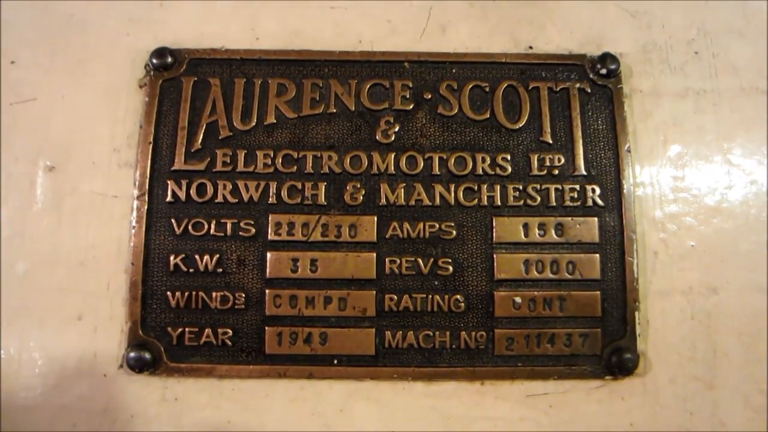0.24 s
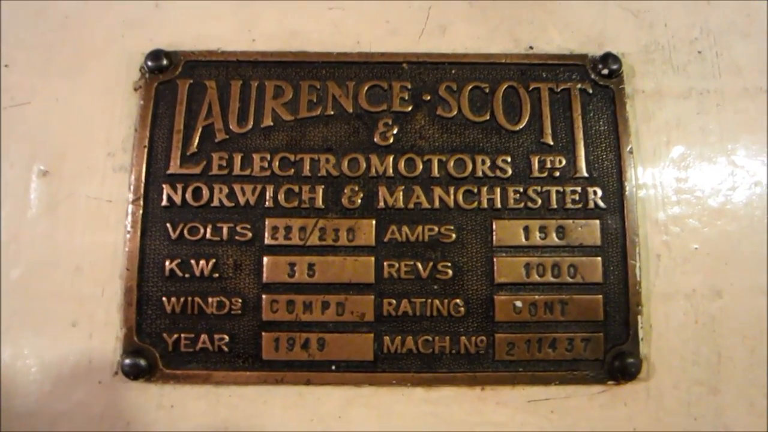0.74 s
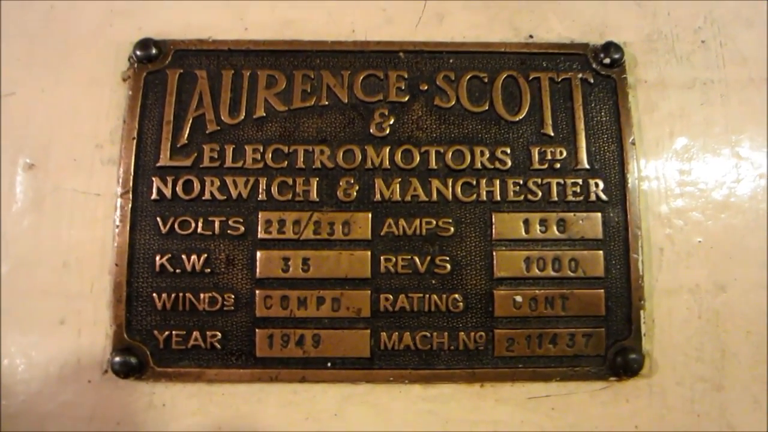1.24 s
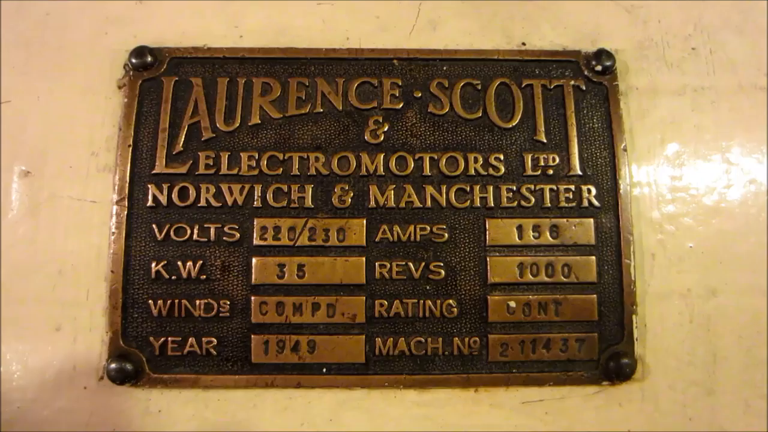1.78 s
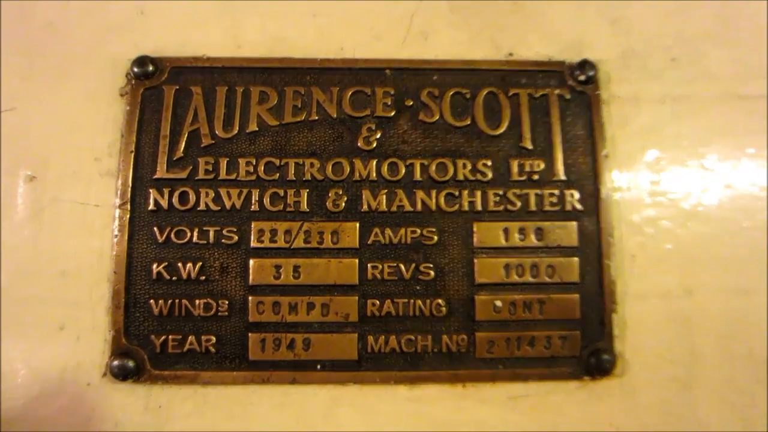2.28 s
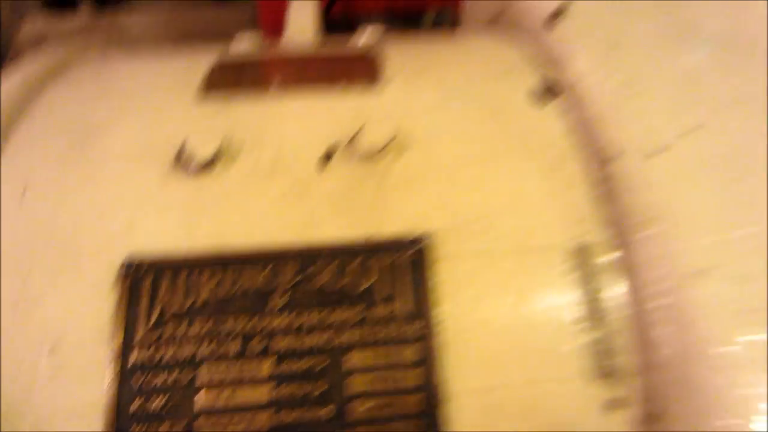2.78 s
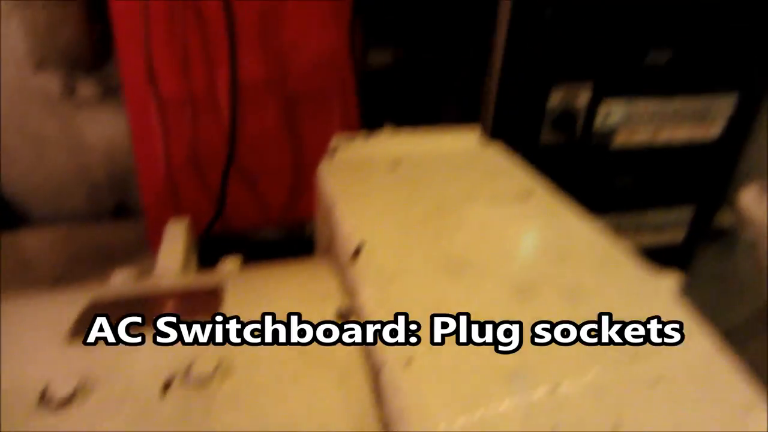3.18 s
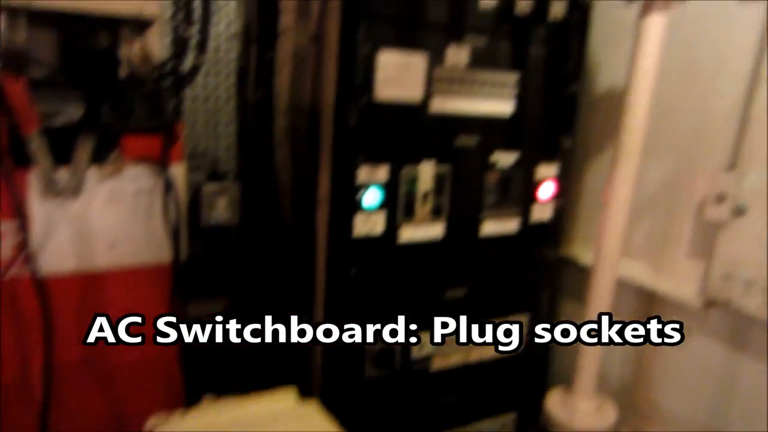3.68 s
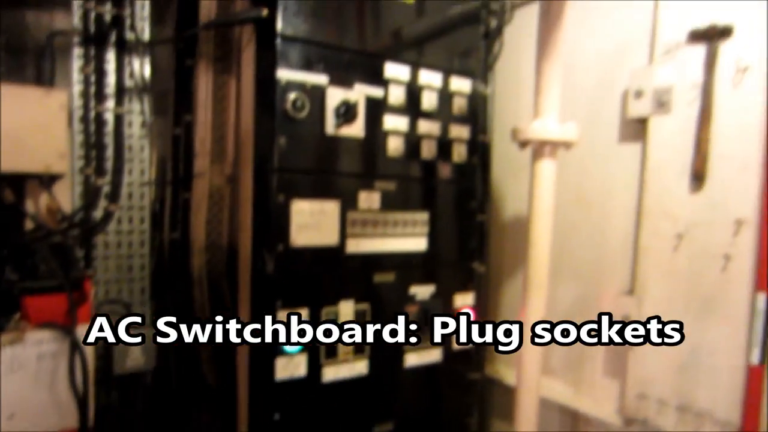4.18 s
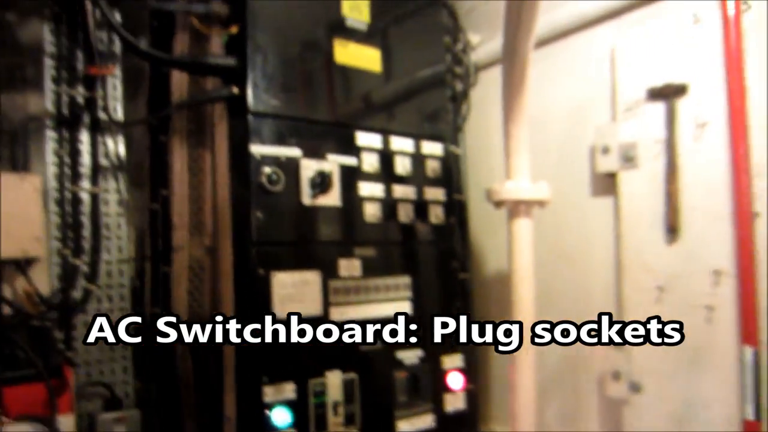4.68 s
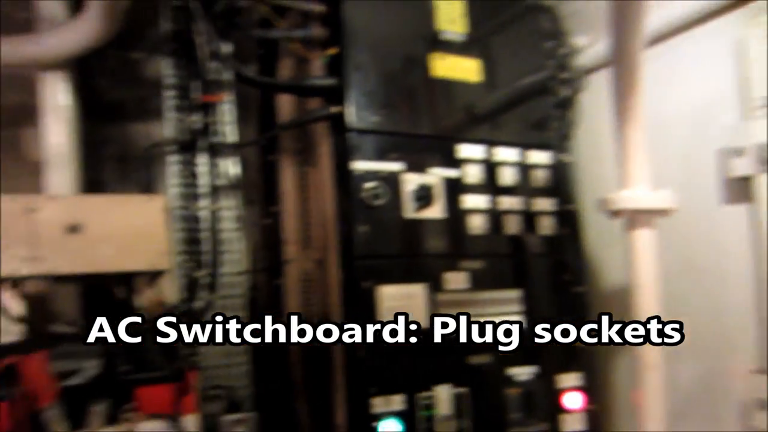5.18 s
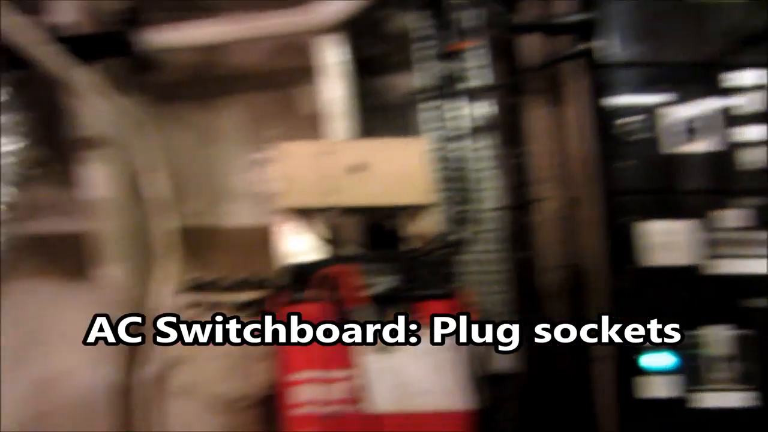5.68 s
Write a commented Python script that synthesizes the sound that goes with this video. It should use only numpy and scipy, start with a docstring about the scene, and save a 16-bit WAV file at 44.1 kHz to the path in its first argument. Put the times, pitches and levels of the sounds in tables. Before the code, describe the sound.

Continuous loud machinery drone, starting beside a cream-painted generator: heavy bass hum, rough engine tones and reverberant roar. Fast valve flutter and a faint, slightly fuzzy whistle sit above. Around three seconds the handheld microphone swings towards the room and switchboard; the single hum recedes, other buzzing tones and airy hiss come forward, and the noise then holds to the end. No speech or separate events.

```python
"""Diesel engine room

Two diesels at slightly different speeds, pumps and fans hum as sums of shaft-order tones over shaped noise.
Once a cycle the valves hiss and random blows ring their gear; a nearly steady whistle, a tone with a slightly
fuzzy edge of narrow noise, rides on top.
The microphone swings from beside a generator to the open room, which changes level and colour."""
import sys
import numpy as np
from scipy import signal
from scipy.fft import rfft, irfft, next_fast_len
from scipy.io import wavfile
from scipy.ndimage import uniform_filter1d

SR = 44100
rng = np.random.default_rng(int(sys.argv[2]) if len(sys.argv) > 2 else 0)


def transcribe(signal):
    """Save signal, clipped to [-1, 1], as a 16-bit WAV file at the path in sys.argv[1]."""
    frames = np.atleast_2d(signal).T
    limited = np.clip(frames, -1, 1)
    pcm = np.round(limited * 32767).astype(np.int16)
    wavfile.write(sys.argv[1], SR, pcm)


N = 261954

CYCLE_HZ, SECOND_CYCLE_HZ = 8.4945, 8.692  # four-stroke cycles of the two diesels
FIRST_FIRING_S, SECOND_FIRING_S, FIRST_VALVE_S = .0085, .0128, .116
SWING_START_S, SWING_END_S = 2.6, 4.1
HUM_ORDER, HUM_NEAR_DB, HUM_OPEN_DB = 18, -15.5, -20.5  # the strongest hum, a standing wave
SURGE_RAD, SURGE_S = .19, .11  # swing of the hum's phase, moment of its greatest lead
FAINT_OPEN_DB = 1.5  # added to the faint orders in the open room
PUMP_HZ, PUMP_DB, ORDER_5_DB = 43.025, -38, -46.5  # levels beside the generator
THROB_DIP_S, THROB_OPEN_DB = .96, 2  # moment when pump and order 5 oppose, lift in the open room
TREBLE_NEAR_DB, TREBLE_OPEN_DB = 7, 1.1  # lift of the roar above 1 kHz
PATCH_DB, SWAY_DB, SWAY_TOP_HZ = .71, .33, 9  # roar: drifting patches, common slow sway
RIPPLE_DB = .8  # the steel room favours some narrow bands
FLICKER_DB, FLICKER_TOP_HZ = .75, 300  # rms flicker of the roar's body
KNOCK_DB, KNOCK_AFTER_S = .5, .0125  # lift of the body just after the valves seat
HISS_NEAR_DB, HISS_OPEN_DB = 3.5, 5  # greatest possible height of a hiss burst
VALVE_NEAR_DB, VALVE_OPEN_DB = -64.5, -55.5
WHISTLE_WIDTH_HZ, WHISTLE_STEADY = 10, 1.8  # width of the fuzzy edge, clean tone against the fuzz
SQUEEZE_AT, EDGE_HZ = 1.6, 15720  # ceiling of the peak rounding, band limit

# roar spectrum beside the generator, before its lifts: (frequency [Hz], density [dB per Hz])
NEAR_SPECTRUM = [(20, -78), (33, -78.5), (52, -71), (68, -69.5), (110, -61), (150, -53.5), (230, -55.5),
                 (300, -52), (400, -54), (850, -60.5), (1100, -66), (1500, -66), (1900, -67.5), (2350, -71),
                 (2700, -77.5), (3300, -81), (4100, -83.5), (6300, -89), (8500, -92.5), (10300, -103.5),
                 (11500, -112), (12700, -110), (15700, -108)]
# roar spectrum in the open room, before its lifts: (frequency [Hz], density [dB per Hz])
OPEN_SPECTRUM = [(20, -75.5), (33, -74), (52, -70), (68, -69), (110, -61), (150, -58), (230, -57),
                 (300, -50.5), (400, -54), (850, -55.5), (1100, -60), (1500, -59), (1900, -61), (2350, -64),
                 (2700, -69), (3300, -73.5), (4100, -75.5), (6300, -81), (8500, -86), (10300, -92.5),
                 (11500, -104), (12700, -103), (15700, -102)]


def gain_of(db):
    """Decibels to a factor."""
    return 10 ** (np.asarray(db) / 20)


def evened(x):
    """Scales to rms 1."""
    return x / np.sqrt(np.mean(x ** 2) + 1e-20)


def read(points, hz):
    """Reads a spectrum on a log-frequency axis."""
    f, value = np.transpose(points)
    return np.interp(np.log(hz + 1), np.log(f + 1), value)


def wander(t, top_hz):
    """Random drift of rms 1: sines up to top_hz, the slower the stronger."""
    partials_hz = np.geomspace(top_hz / 20, top_hz, num=20)
    return evened(sum(np.sin(2 * np.pi * (f * t + rng.random())) / np.sqrt(f) for f in partials_hz))


def open_share(t):
    """How far the microphone has turned to the open room, 0-1."""
    return np.clip((t - SWING_START_S) / (SWING_END_S - SWING_START_S), 0, 1)


def between(near_db, open_db, t):
    """A level that passes from one place to the other with the swing."""
    return near_db + (open_db - near_db) * open_share(t)


def by_place(near, midway, room, t):
    """A value that holds in each of three places and glides between them."""
    # holds of the swing: leaves the generator, midway from, midway until, open room from [s]
    places_s = [2.8, 3.05, 3.55, 4.0]
    return np.interp(t, places_s, [near, midway, midway, room])


def hum_turn_rad(t):
    """Phase of the strongest hum, locked to the firing."""
    return 2 * np.pi * HUM_ORDER * CYCLE_HZ * (t - FIRST_FIRING_S)


def valve_burst():
    """A bump of height 1 once a cycle, when the loudest valves seat."""
    turn = ((np.arange(N) / SR - FIRST_VALVE_S) * CYCLE_HZ + .5) % 1 - .5  # cycles from the seating
    return np.exp(-(turn / .09) ** 2)


def tones(hz, levels_db, start_cycles, waver_db):
    """Tones below 2.7 kHz that glide between the places and waver; made at an eighth of the rate."""
    t = np.arange(N // 8 + 2) * 8 / SR
    share = open_share(t)
    drift = np.array([wander(t[::64], 3.3) for _ in range(8)])
    slip_s = .0003 * rng.standard_normal(256)  # other reflections reach the open room
    out = np.zeros(len(t))
    for k, (f, gains, start) in enumerate(zip(hz, gain_of(levels_db).T, start_cycles)):
        waver = np.interp(t, t[::64], drift[k % 8])
        carrier = np.cos(2 * np.pi * (f * (t + slip_s[k] * share) + start))
        out += by_place(*gains, t) * gain_of(waver_db * waver) * carrier
    return np.sqrt(2) * signal.resample_poly(out, 8, 1)[:N]


def main_engine():
    """Firing orders crest together in one pulse per cylinder; other orders come from unlike cylinders."""
    # loudest cycle orders: (multiple, beside generator [dB], midway [dB], open room [dB])
    main_orders = [(7, -56, -54, -50), (8, -61, -63, -56), (9, -61, -53, -50), (10, -62, -58, -56),
                   (11, -55, -50, -50), (12, -43, -45, -39), (13, -63, -57, -55), (14, -46, -50, -46),
                   (16, -42, -46, -51), (20, -50, -47, -41), (21, -40, -44, -38), (22, -60, -51, -46),
                   (23, -46, -43, -37), (24, -31, -35, -36), (25, -42, -44, -45), (26, -45, -49, -45),
                   (27, -41, -41, -40), (28, -55, -46, -44), (29, -44, -52, -43), (30, -27, -23, -21.5),
                   (31, -39, -35, -33), (32, -49, -47, -44), (33, -44, -44, -39), (34, -34, -36, -41),
                   (35, -43, -42, -56), (36, -33, -29, -27), (37, -46, -38, -41), (39, -41, -44, -40),
                   (41, -54, -42, -43), (42, -52, -39, -40), (45, -55, -43, -36), (49, -47, -45, -40),
                   (54, -54, -42, -45), (56, -45, -54, -42), (62, -46, -43, -47), (67, -54, -51, -40),
                   (86, -44, -47, -38), (87, -49, -42, -42), (95, -48, -43, -52), (96, -45, -38, -45),
                   (97, -42, -55, -52), (99, -41, -33, -40), (101, -48, -43, -45), (103, -34, -38, -54),
                   (105, -38, -55, -51), (109, -49, -45, -45), (114, -48, -50, -40), (119, -42, -44, -40),
                   (133, -45, -56, -49), (139, -52, -61, -46), (148, -66, -56, -46)]
    # typical level of the other orders over the roar density: (frequency [Hz], level [dB])
    faint_lift = [(220, 5), (350, 7.5), (900, 8), (2100, 1)]
    order, *levels_db = np.transpose(main_orders)
    chance = rng.random(256)
    start = np.where(order % 6 == 0, -order * CYCLE_HZ * FIRST_FIRING_S, chance[order.astype(int)])
    loud = tones(order * CYCLE_HZ, levels_db, start, waver_db=.4)

    # the crank surges once a cycle
    t = np.arange(N) / SR
    surge = SURGE_RAD * np.cos(2 * np.pi * CYCLE_HZ * (t - SURGE_S))
    hum_gain = np.sqrt(2) * gain_of(between(HUM_NEAR_DB, HUM_OPEN_DB, t))
    loud += hum_gain * np.cos(hum_turn_rad(t) + surge)

    # faint orders follow the roar's colour, each of random strength in each place
    faint = np.setdiff1d(np.arange(20, 256), order)
    faint_hz = faint * CYCLE_HZ
    power = np.minimum(rng.exponential(1, (256, 3)), 2)
    spread_db = 10 * np.log10(power)[faint].T
    lift_db = read(faint_lift, faint_hz)
    near_db = read(NEAR_SPECTRUM, faint_hz) + lift_db
    open_db = read(OPEN_SPECTRUM, faint_hz) + lift_db + FAINT_OPEN_DB
    faint_db = spread_db + [near_db, (near_db + open_db) / 2, open_db]
    return loud + tones(faint_hz, faint_db, chance[faint], waver_db=2.5)


def other_machines():
    """The second diesel beats slowly against the first; pumps and fans add lone tones."""
    # loudest orders of the second diesel: (multiple, beside generator [dB], midway [dB], open room [dB])
    second_orders = [(9, -57, -62, -50), (10, -45, -46, -49), (12, -56, -58, -50), (14, -46, -45, -49),
                     (15, -52, -53, -46), (16, -41, -44, -45), (17, -47, -45, -45), (18, -38, -40, -36),
                     (19, -49, -46, -42), (20, -43, -48, -49), (24, -42, -52, -51), (26, -60, -52, -44),
                     (28, -47, -47, -42), (29, -55, -46, -45), (30, -42, -44, -39), (33, -48, -44, -45),
                     (35, -44, -38, -44), (42, -40, -45, -40)]
    # pumps and fans on own shafts: (frequency [Hz], beside generator [dB], midway [dB], open room [dB])
    auxiliary = [(21.5, -54, -53, -51), (326.6, -40, -48, -35), (343.2, -38, -49, -35),
                 (400.5, -43, -31, -33), (429.1, -46, -44, -46), (480, -51, -49, -40),
                 (514.8, -42, -53, -43), (573.4, -54, -52, -39), (675.9, -49, -42, -45),
                 (721.2, -53, -48, -41), (942.3, -44, -47, -43)]
    order, *levels_db = np.transpose(second_orders)
    firing_start = -order * SECOND_CYCLE_HZ * SECOND_FIRING_S
    start = np.where(order % 6 == 0, firing_start, rng.random(len(order)))
    second = tones(order * SECOND_CYCLE_HZ, levels_db, start, waver_db=.8)
    hz, *levels_db = np.transpose(auxiliary)
    return second + tones(hz, levels_db, rng.random(len(hz)), waver_db=.1)


def deep_throb():
    """A pump shaft runs just faster than order 5; the pair swells and dips about every two seconds."""
    t = np.arange(N) / SR
    turn = 2 * np.pi * (t - THROB_DIP_S)
    order_5 = gain_of(ORDER_5_DB) * np.cos(5 * CYCLE_HZ * turn)
    pump = gain_of(PUMP_DB) * np.cos(PUMP_HZ * turn)
    return np.sqrt(2) * gain_of(between(0, THROB_OPEN_DB, t)) * (order_5 - pump)


def roar():
    """Reverberant machinery noise in drifting patches, its colour turning with the microphone."""
    # left-right likeness: (frequency [Hz], correlation [0-1])
    likeness = [(30, .6), (60, .85), (110, .97), (200, .99), (600, .96), (1500, .86), (2500, .82),
                (3500, .75), (7000, .56), (10000, .3), (13000, .03)]
    # level on top of the swing, full above 500 Hz: (time [s], level [dB])
    level_curve = [(2.0, 0), (2.5, 1), (3.0, -.6), (3.6, -0.6), (4.15, .5), (4.5, -0.3), (5.0, 0.5),
                   (5.9, -1)]
    frames, hz = N // 512 + 5, np.fft.rfftfreq(2048, 1 / SR)
    a, b, c, d, patches = rng.standard_normal((frames, 1025, 5)).T
    patches = uniform_filter1d(patches, size=24, axis=0)
    patches = evened(uniform_filter1d(patches, size=5, axis=1))
    t = np.arange(frames) * 512 / SR
    share = open_share(t)

    near_db, open_db = read(NEAR_SPECTRUM, hz)[:, None], read(OPEN_SPECTRUM, hz)[:, None]
    level_db = near_db * (1 - share) + open_db * share
    level_db = level_db + PATCH_DB * patches + SWAY_DB * wander(t, SWAY_TOP_HZ)
    above_1k = np.clip(np.log2(hz + 1) - 9, 0, 1)[:, None]  # fades in from 500 Hz
    level_db += above_1k * between(TREBLE_NEAR_DB, TREBLE_OPEN_DB, t)
    above_500 = np.clip(np.log2(hz / 250 + 1e-9), 0, 1)[:, None]  # fades in from 250 Hz
    level_db += above_500 * np.interp(t, *np.transpose(level_curve))
    ripple = evened(uniform_filter1d(rng.standard_normal(1025), size=2))[:, None]
    level_db += RIPPLE_DB * above_1k * ripple

    same = np.clip(read(likeness, hz), -1, 1)[:, None]
    left = a + 1j * b
    right = same * left + np.sqrt(1 - same ** 2) * (c + 1j * d)
    z = np.array([left, right]) * gain_of(level_db) * np.sqrt(3 * SR / 4096)  # density to STFT scale
    top = np.clip(1.2 * np.log2(hz / 4200 + 1e-9), 0, 1)[:, None]  # share that is valve hiss
    split = np.array([z * (1 - top), z * top])
    body, hiss = signal.istft(split, nperseg=2048, noverlap=1536)[1][..., :N]

    # each hiss burst has its own strength; the body throbs faintly with the strongest hum
    t = np.arange(N) / SR
    burst = valve_burst()
    cycle = np.round((t - FIRST_VALVE_S) * CYCLE_HZ).astype(int)
    strength = rng.uniform(.32, 1, size=64)[cycle]
    knock_db = KNOCK_DB * np.roll(burst, round(KNOCK_AFTER_S * SR))
    flicker_db = FLICKER_DB * wander(t, FLICKER_TOP_HZ) + knock_db
    throb = 1 + .045 * np.cos(hum_turn_rad(t))
    hiss_db = between(HISS_NEAR_DB, HISS_OPEN_DB, t) * strength * burst
    return body * gain_of(flicker_db) * throb + hiss * gain_of(hiss_db)


def valve_gear():
    """Small blows cluster at the seating and ring the gear, one mode at a time, unlike at each port."""
    # what the gear rings with: (frequency [Hz], level [dB], t60 [s])
    valve_modes = [(6450, -4, .04), (7420, 0, .06), (7840, -8, .05), (8330, -5, .04), (9350, -8, .04),
                   (9480, -10, .04), (10400, -13, .04)]
    blows_per_s = 160 * valve_burst() + 12  # for each mode
    ring_s, out = np.arange(6000) / SR, np.zeros((2, N))
    for hz, db, t60_s in valve_modes:
        size_db = 1.5 * np.minimum(rng.exponential(1, N), 4)
        size = gain_of(size_db) * (rng.random(N) < blows_per_s / SR)
        blows = size * (rng.standard_normal(N) + .54 * rng.standard_normal((2, N)))
        onset = np.minimum(ring_s / .0045, 1)
        tap = gain_of(db - 60 * ring_s / t60_s) * np.sin(2 * np.pi * hz * ring_s) * onset
        out += signal.oaconvolve(blows, tap[None])[:, :N]
    return gain_of(between(VALVE_NEAR_DB, VALVE_OPEN_DB, np.arange(N) / SR)) * evened(out)


def whistle():
    """A nearly steady gliding tone, its edge slightly fuzzy with narrow noise; flares as the valves seat."""
    # glide of the whistle, before waver and flare: (time [s], frequency [Hz], level [dB])
    glide = [(0, 7424, -63), (.9, 7419, -64), (1.4, 7415, -69), (2.2, 7402, -68), (2.6, 7393, -61),
             (3.4, 7387, -60), (4.0, 7385, -63), (4.5, 7385, -58), (4.9, 7384, -67), (5.25, 7383, -59),
             (5.94, 7378, -59)]
    t, r = np.arange(N) / SR, np.exp(-np.pi * WHISTLE_WIDTH_HZ / SR)
    fuzz = signal.lfilter([1 - r], [1, -r], rng.standard_normal((N, 2)) @ [1, 1j])
    s, *curves = np.transpose(glide)
    hz, level_db = (np.interp(t, s, curve) for curve in curves)
    carrier = np.exp(2j * np.pi * np.cumsum(hz) / SR)
    tone = evened(((WHISTLE_STEADY + fuzz / np.std(fuzz)) * carrier).real)
    return tone * gain_of(level_db + 1.2 * wander(t, 8) + 2.2 * valve_burst())


def scene():
    """Shaft tones reach the two ports at one level and a few degrees apart; the whistle leans right."""
    hum = main_engine() + other_machines() + deep_throb()
    quarter = signal.hilbert(hum, next_fast_len(N))[:N].imag  # a quarter cycle late
    ports = hum + .071 * np.outer([1, -1], quarter)
    return ports + roar() + valve_gear() + whistle() * gain_of([[-1.4], [1.4]])


def record(dry):
    """Peaks are rounded off; the ports differ a little in deep bass and treble; then the band limit."""
    # port balance: (frequency [Hz], left minus right [dB])
    balance = [(45, -2.5), (90, -.5), (140, 0), (2700, 0), (9000, -1.2)]
    size = next_fast_len(N)
    half_db = read(balance, np.fft.rfftfreq(size, 1 / SR)) / 2
    rounded = SQUEEZE_AT * np.tanh(dry / SQUEEZE_AT)
    ports = irfft(rfft(rounded, size) * gain_of([half_db, -half_db]), size)[:, :N]
    lowpass = signal.firwin(1023, EDGE_HZ, window=("kaiser", 9), fs=SR)
    return signal.oaconvolve(ports, lowpass[None], "same")


dry = scene()
out = record(dry)
transcribe(out)
```